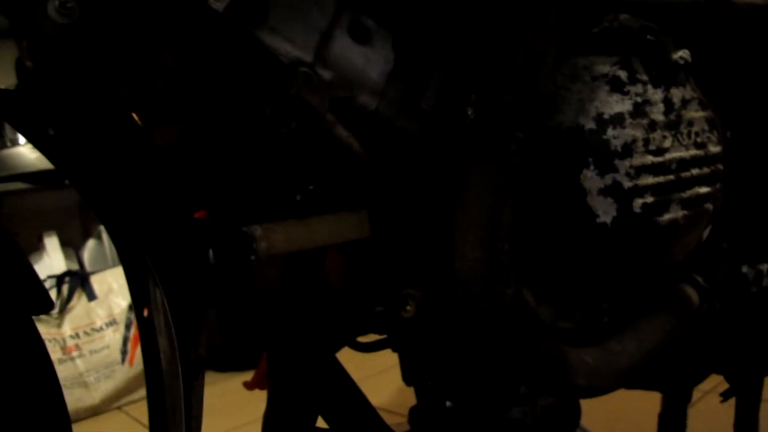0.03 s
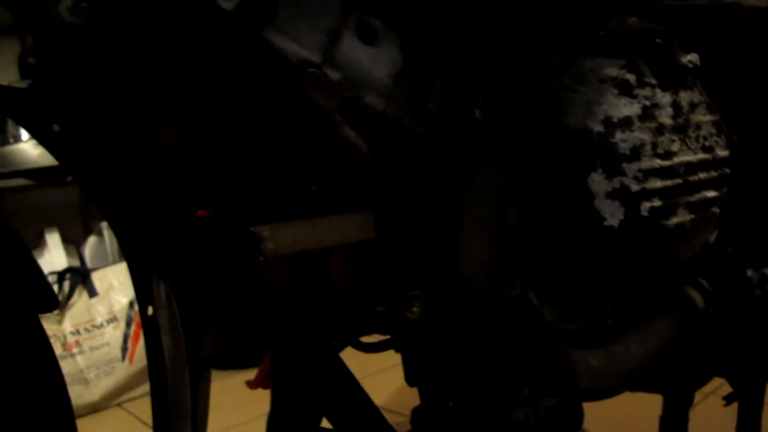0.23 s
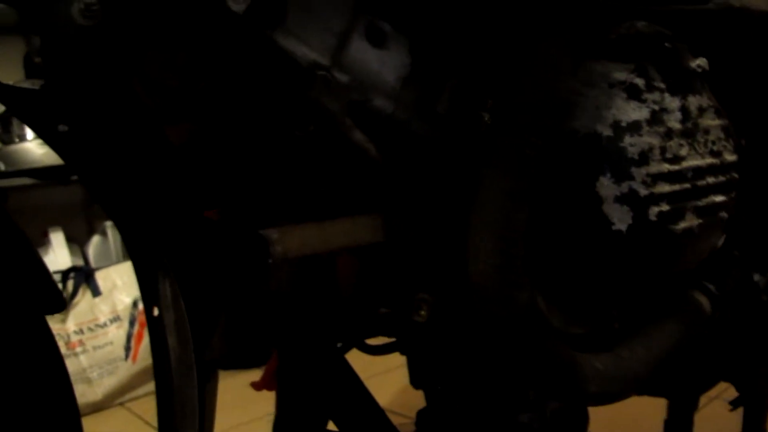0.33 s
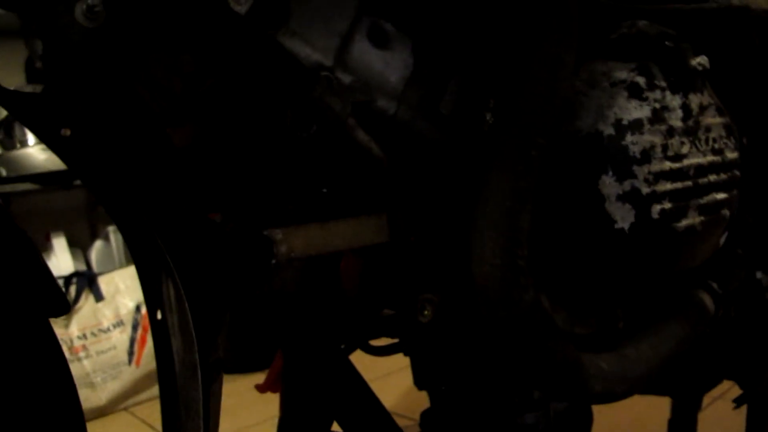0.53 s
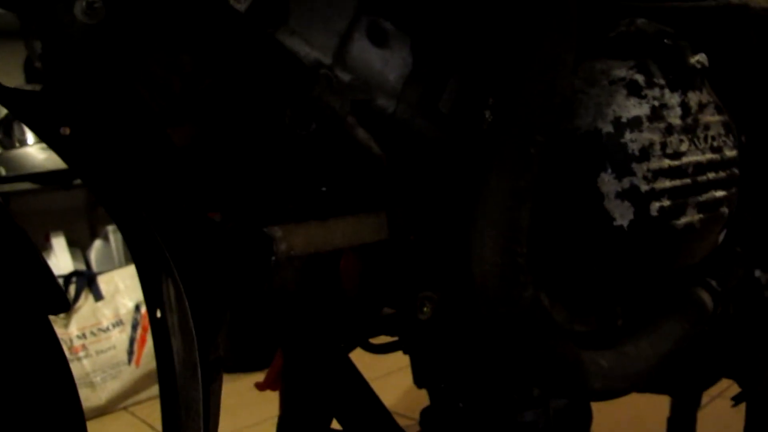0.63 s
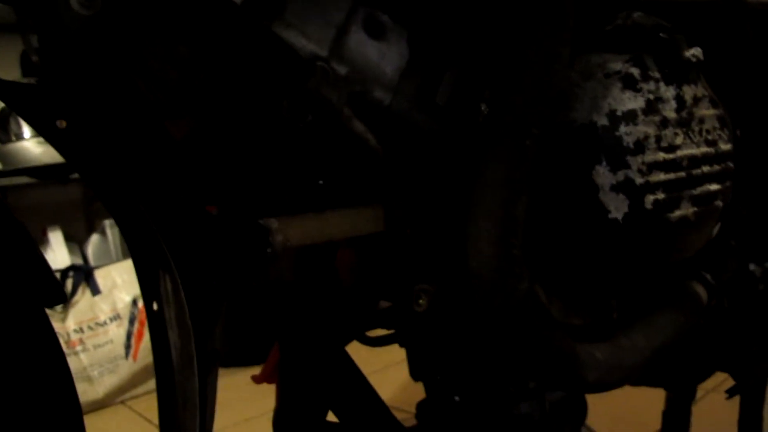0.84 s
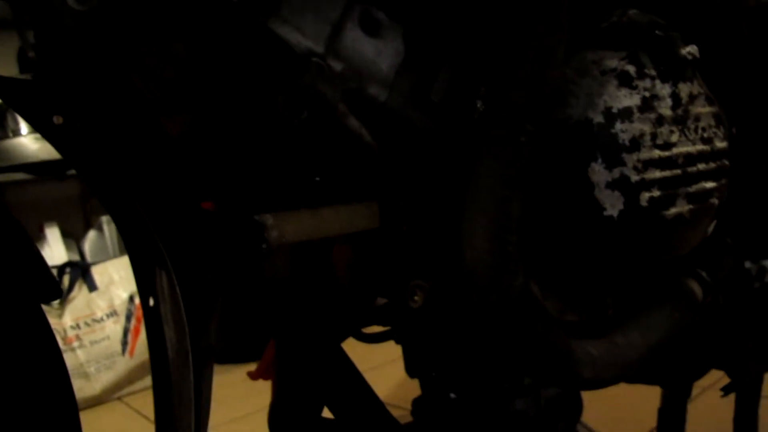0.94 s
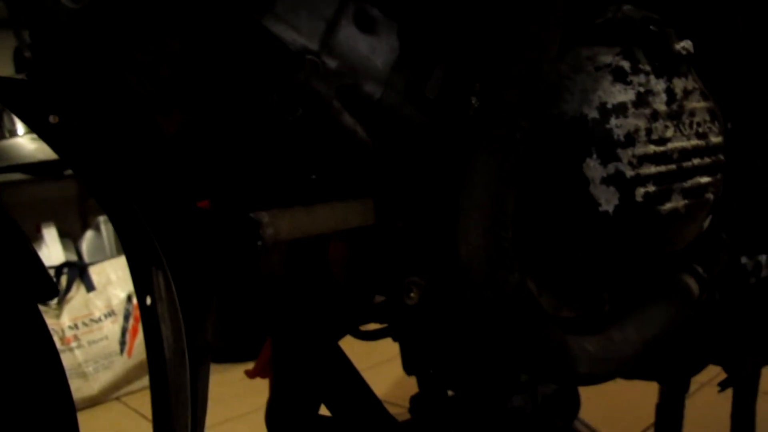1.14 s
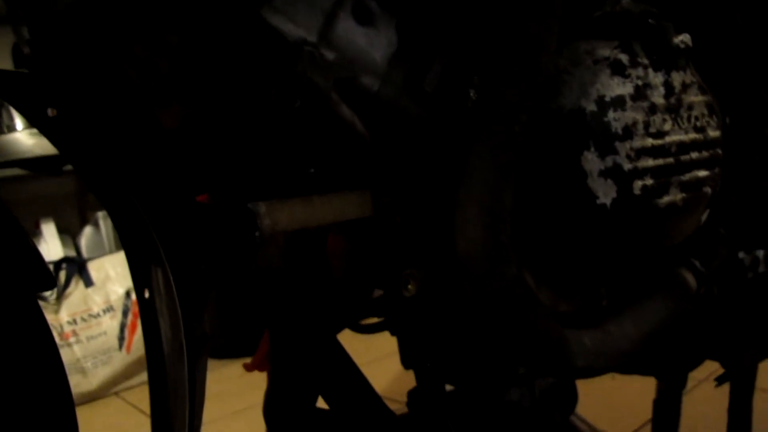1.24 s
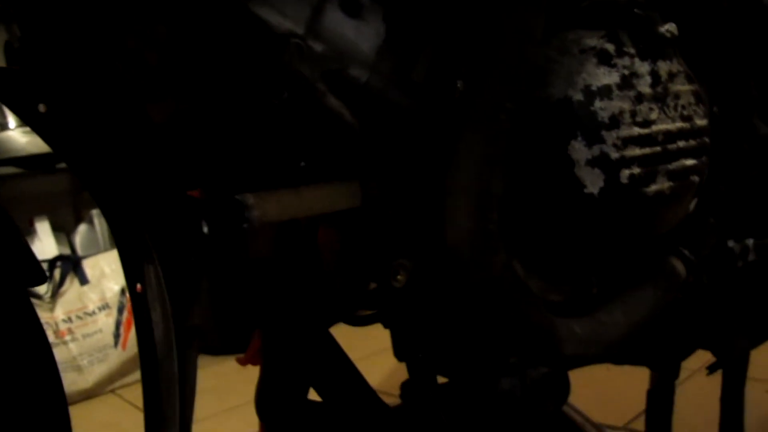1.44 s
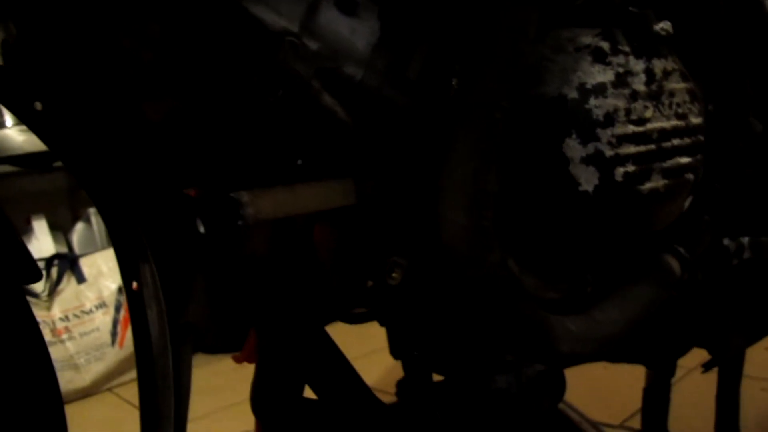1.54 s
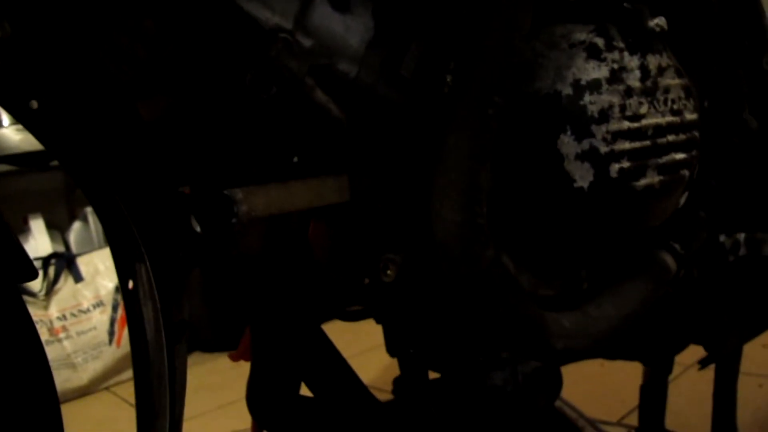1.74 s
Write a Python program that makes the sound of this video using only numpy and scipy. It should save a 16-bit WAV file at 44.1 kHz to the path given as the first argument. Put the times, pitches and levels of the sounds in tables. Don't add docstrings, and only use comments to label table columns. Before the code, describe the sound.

Close small-camera pickup in a quiet workshop: the fading tail of an earlier burst, one brief grinding starter motor spin, dull thuds and room echo, then wavering low hum with a few small ticks.

```python
import sys
import numpy as np
from scipy import signal
from scipy.fft import rfft, irfft, next_fast_len
from scipy.io import wavfile
from scipy.ndimage import uniform_filter1d

SR = 44100
rng = np.random.default_rng(int(sys.argv[2]) if len(sys.argv) > 2 else 0)


def elevation(decibels):
    levels = np.asarray(decibels, float)
    return 10 ** (levels / 20)


def to_wav(sig):
    pcm = np.clip(np.atleast_2d(sig), -1, 1) * 32767
    pcm = np.round(pcm).astype(np.int16)
    wavfile.write(sys.argv[1], SR, pcm.T)


N = 79380
RUNNING = slice(int(.28 * SR) + 1, int(.5 * SR))


def read(table, hz):
    a = np.array(table, float)
    return np.interp(np.log(np.maximum(hz, 1)), np.log(np.maximum(a[:, 0], 1)), a[:, 1])


def shape(x, gain):
    n = next_fast_len(N + 4096)
    return irfft(rfft(x, n) * gain(np.arange(n // 2 + 1) * SR / n), n)[..., :N]


def unit(x):
    return x / np.sqrt(np.mean(x ** 2))


def loud(x):
    return x / x[RUNNING].std()


def noise():
    return rng.standard_normal(N)


def walk(rate):
    k = int(SR / rate)
    held = np.repeat(rng.standard_normal(N // k + 1), k)
    return 1.3 * uniform_filter1d(uniform_filter1d(held, k), k)[:N]


def ring(x, hz, width_hz):
    return signal.lfilter(*signal.iirpeak(hz, hz / width_hz, SR), x)


def smear(x):
    path = rfft(rng.standard_normal(512) * np.exp(-np.arange(512) / 60.))
    return signal.fftconvolve(x, irfft(path / np.abs(path)))[:N]


# t/s, level/dB
HUM_LEVEL = [
    (0, -10),
    (.7, -5.5),
    (.78, 1.5),
    (.93, 2),
    (.985, -2),
    (1.04, 1.5),
    (1.345, 1.5),
    (1.385, -26),
    (1.46, 0.5),
    (1.8, 1.5),
]


def hum(t):
    phase = 2 * np.pi * np.cumsum(69 * (1 + 0.0192 * walk(14))) / SR
    tone = np.sin(phase)
    for order, db in [(2, -18), (3, -11.5), (4, -14.5)]:
        tone = tone + elevation(db) * np.sin(order * phase)
    return tone * elevation(-45 + np.interp(t, *np.array(HUM_LEVEL).T) + 1.2 * walk(15.26))


# f/Hz, level/dB
AIR_SPECTRUM = [(20, -14), (70, -6.5), (200, -16), (1000, -22), (2300, -28.5), (4000, -38), (6500, -38),
                (10000, -47.5), (15600, -52.5)]


def air():
    out = 0
    for lo in 15 * 2. ** np.arange(10):
        def band(f):
            octaves = np.log2(np.maximum(f, 1) / lo / 1.43)
            return elevation(read(AIR_SPECTRUM, f)) * np.cos(np.pi / 2 * np.clip(octaves, -1, 1))
        out = out + shape(np.array([noise(), noise()]), band) * elevation(0.73 * walk(8.7))
    return elevation(-46.5) * unit(out)


# f/Hz, level/dB
EARLIER_SPECTRUM = [(300, -18), (600, -10.5), (1600, -4), (2300, -8.5), (3800, -13.5), (6800, -10.5),
                    (11400, -37.5), (15600, -59)]


def earlier_burst(t):
    tail = unit(shape(noise(), lambda f: elevation(read(EARLIER_SPECTRUM, f))))
    return elevation(-33.5 - 60 * t / 0.6) * tail


# t/s, tooth knock rate f/Hz
KNOCK_RATE = [(.14, 62), (.175, 78), (.205, 112), (.237, 172), (.27, 265), (.314, 348), (.36, 408),
              (.445, 450), (.5, 392)]


def shaft(t):
    coasting = np.maximum(t - KNOCK_RATE[-1][0], 0)
    sag_hz_per_s = 700
    rate = np.maximum(np.interp(t, *np.array(KNOCK_RATE).T) - sag_hz_per_s * coasting, 60)
    turns = np.cumsum(rate * (1 + .005 * walk(40))) / SR
    return rate, turns - turns[int(.187 * SR)] % 1 + 1


def knocks_and_scrape(rate, turns, level):
    jitter, scatter_db, puff, blur_hz = .07, 3, 0.49, 150
    chance = rng.standard_normal((N // 40, 2)).clip(-2, 2)
    count = turns.astype(int)
    size = elevation(scatter_db * chance[count, 1])
    since_knock = np.maximum(turns - count + jitter * (chance[count, 0] - 2), 0)
    struck = since_knock > 0
    knocks = np.diff(struck * 1., prepend=0).clip(0) * size / np.sqrt(rate)
    blur = 1 / (1 + (blur_hz / rate) ** 2)
    pulses = np.exp(-since_knock / puff) * struck * size * 2
    scrape = noise() * (blur + (1 - blur) * pulses) * elevation(1.26 * walk(55.55))
    return loud(elevation(-7) * loud(smear(level * knocks)) + elevation(-2) * loud(level * scrape))


WHINE_ORDERS = [2, 3, 4, 5, 6, 7, 8, 10]
WHINE_LEVELS = [-12, 2, -6.5, -3.5, -12.5, -7, -10, -15]


def whine(turns, level):
    out = 0
    for order, db in zip(WHINE_ORDERS, WHINE_LEVELS):
        out = out + elevation(db + 2.5 * walk(43.9)) * np.sin(2 * np.pi * order * turns)
    return loud(shape(level * out, lambda f: 1 / (1 + (746.0 / np.maximum(f, 1)) ** 3)))


# f/Hz, width/Hz, level/dB
HOUSING_MODES = [(256, 24.5, -14), (340, 45, -17.5), (430, 44, -22), (530.5, 15, -15), (736.4, 14.3, -3.5),
                 (1098, 53, -8.5), (1300, 103, -4.5), (1452, 27, 5), (1756, 48, -2), (1789, 20, 3),
                 (2083, 60, -5), (2268, 17, -1.5), (2250, 68, -11.5), (2619, 18, -3),
                 (2920, 126, -10.5), (3285, 68, -1), (3475, 62, -5.5), (3794, 204, -16), (4250, 88, -12),
                 (6420, 285, -8), (7000, 103, -10), (7180, 250, -10), (7700, 89, -15), (8620, 120, -12)]


def housing(drive):
    out = 0
    for k, (hz, width_hz, db) in enumerate(HOUSING_MODES):
        out = out + (-1) ** k * elevation(db) * ring(drive, hz, width_hz)
    return shape(loud(out), lambda f: 1 / (1 + (f / 8830.0) ** 12))


# f/Hz, t60/s, level/dB
FRAME_MODES = [(775, .3, -28), (1110, .45, -19), (1352, .65, -17), (1385, .55, -18), (1790, .4, -18),
               (2600, .3, -21)]


def frame(force):
    return sum(elevation(db) * loud(ring(force, hz, np.log(1000) / np.pi / t60)) for hz, t60, db in FRAME_MODES)


# t/s, level/dB
SPIN_LEVEL = [(.14, -50), (0.174, -36.5), (0.204, -30), (0.251, -18.5), (.29, -15.5), (0.361, -15.5),
              (0.391, -19.5), (0.433, -15.5), (0.508, -20)]
# f/Hz, level/dB
BODY_SPECTRUM = [(150, -42), (500, -40), (730, -5.5), (1700, -0.5), (4200, -9.5), (5100, -17), (7400, -14),
                 (11400, -40.5), (12500, -88)]


def motor(t):
    s, db = np.array(SPIN_LEVEL).T
    coast_db = -260 * np.maximum(t - s[-1], 0)
    level = elevation(np.interp(t, s, db) + coast_db) * np.clip((t - s[0] + 0.048) / 0.022, 0, 1)
    rate, turns = shaft(t)
    drive = knocks_and_scrape(rate, turns, level)
    tone = whine(turns, level)
    broad = loud(shape(drive, lambda f: elevation(read(BODY_SPECTRUM, f))))
    modes = housing(drive) + frame(drive + elevation(-14) * tone)
    ceiling = 4.5
    total = ceiling * np.tanh(loud(modes + elevation(1.5) * broad + elevation(-2) * tone) / ceiling)
    hiss = elevation(-60) * loud(ring(ring(drive, 14600, 900), 14600, 900))
    return level[RUNNING].mean() * (shape(total, lambda f: 1 / (1 + (f / 11950.0) ** 40)) + hiss)


# t/s, peak level/dB, f/Hz, t60/s
THUD_EVENTS = [
    (0.427, -31, 78.6, 0.34),
    (0.479, -36, 96.9, 0.64),
    (0.531, -46, 87.5, 0.16),
]


def thuds(t):
    out = 0
    for s, db, hz, t60 in THUD_EVENTS:
        decay = elevation(db - 60 * np.maximum(t - s, 0) / t60) * (t >= s)
        out = out + decay * np.sin(2 * np.pi * hz * (t - s))
    return out


# t/s, level/dB, centre f/Hz, width/octaves, t60/s
TICK_EVENTS = [
    (1.254, -55, 3700, .3, .06),
    (1.29, -60, 2100, .4, .04),
    (1.465, -57, 4600, .2, .06),
    (1.466, -68, 7800, .15, .06),
    (1.6163, -42, 2550, .3, .04),
    (1.617, -58, 4600, .3, .04),
    (1.62, -60, 3500, .9, .12),
]


def ticks(t):
    out = 0
    for s, db, hz, width, t60 in TICK_EVENTS:
        u = np.maximum(t - s, 0)
        grit = unit(shape(noise(), lambda f: np.exp(-(np.log2(np.maximum(f, 1) / hz) / width) ** 2)))
        snap = 1.6 * np.sin(2 * np.pi * hz * u) * elevation(-120 * u / t60)
        out = out + elevation(db - 60 * u / t60) * np.clip(u / .0005, 0, 1) * (grit + snap)
    return out


def room(x):
    t = np.arange(N) / SR

    def fade(t60):
        return noise() * elevation(-60 * t / t60) * np.clip(t / 0.0062, 0, 1)

    def low(f):
        return 1 / (1 + (f / 3700.0) ** 2)

    tail = shape(fade(0.54), low) + shape(fade(0.41), lambda f: 1 - low(f))
    return signal.fftconvolve(x, tail / np.sqrt(np.sum(tail ** 2)))[:N]


def ports(x, other, shade, alike):
    lag_s = 4e-5

    def coherence(f):
        return np.clip(read(alike, f), 0, 1)

    def tilt(f):
        return elevation(read(shade, f) / 2)

    direct = shape(x, lambda f: tilt(f) * coherence(f) * np.exp(-2j * np.pi * f * lag_s))
    stray = shape(other, lambda f: tilt(f) * np.sqrt(1 - coherence(f) ** 2))
    return np.array([direct + stray, shape(x, lambda f: 1 / tilt(f))])


# f/Hz, left minus right level/dB
SOURCE_SHADE = [(100, -3), (1100, -4), (3500, -3), (4800, -7.5), (6100, -10), (8500, -22), (12000, -21.5)]
# f/Hz, likeness/0-1
SOURCE_COHERENCE = [(200, .98), (1200, .96), (2500, .86), (5000, .3), (9000, .4)]
# f/Hz, left minus right level/dB
AIR_PORT_SHADE = [(100, -3), (3000, -3), (7000, -3.5), (12000, 0)]
# f/Hz, likeness/0-1
AIR_COHERENCE = [(100, 0.95), (1000, 0.87), (3000, 0.45), (7000, 0.13), (12000, 0.12)]


def scene():
    t = np.arange(N) / SR
    low = hum(t) + thuds(t)
    spin, tick = motor(t), ticks(t)
    near = spin + tick
    wet = elevation(-7) * spin + elevation(-12) * tick
    tails = [room(wet) + earlier_burst(t) for _ in range(2)]
    half_shade = [(f, 0.73 * d) for f, d in SOURCE_SHADE]
    duck = elevation(-2.5 * np.clip(1 - (t - .6) / .35, 0, 1))
    return (ports(near + low, smear(near), SOURCE_SHADE, SOURCE_COHERENCE)
            + ports(*tails, half_shade, SOURCE_COHERENCE)
            + duck * ports(*air(), AIR_PORT_SHADE, AIR_COHERENCE))


def top_cut(x):
    return signal.sosfilt(signal.butter(12, 15700, fs=SR, output="sos"), x)


def record(dry):
    return top_cut(dry)


dry = scene()
out = record(dry)
to_wav(out)
```